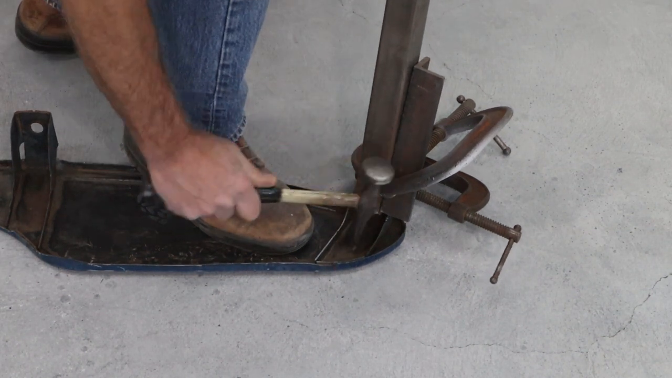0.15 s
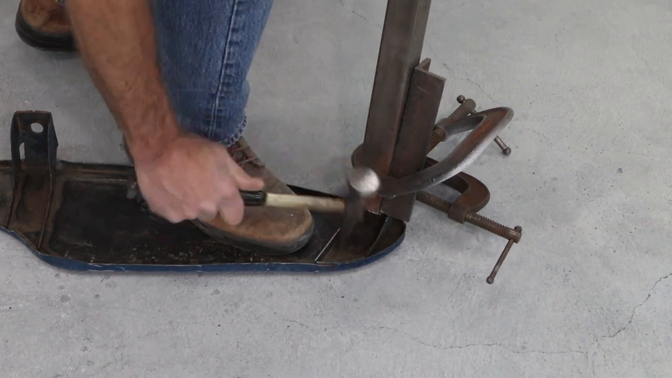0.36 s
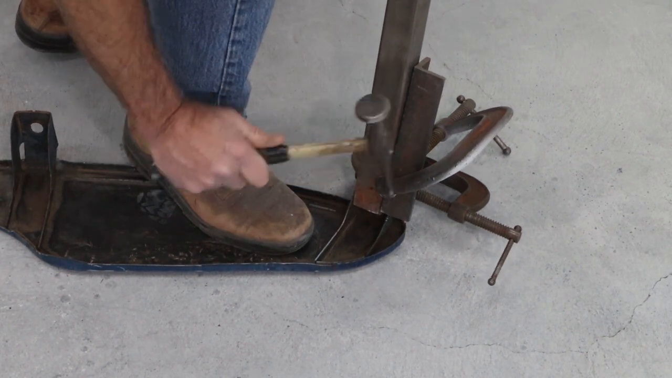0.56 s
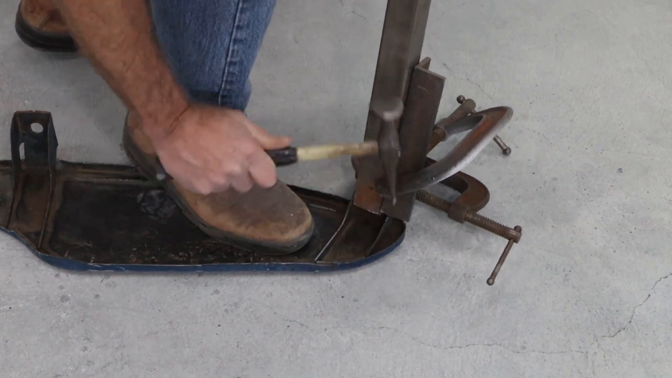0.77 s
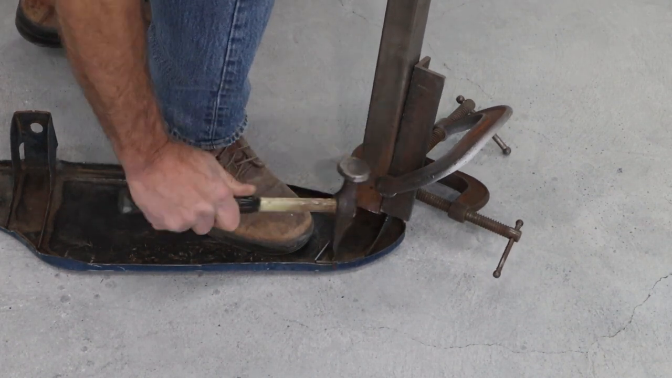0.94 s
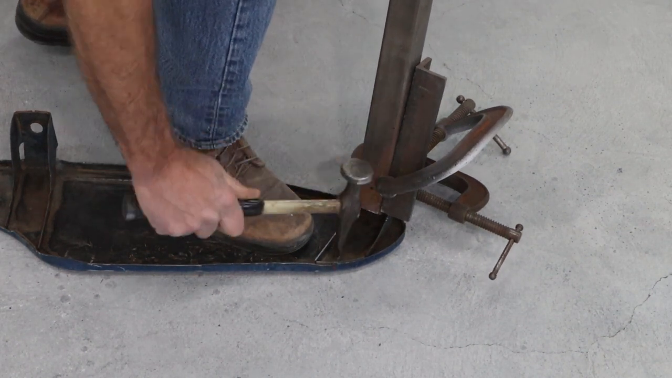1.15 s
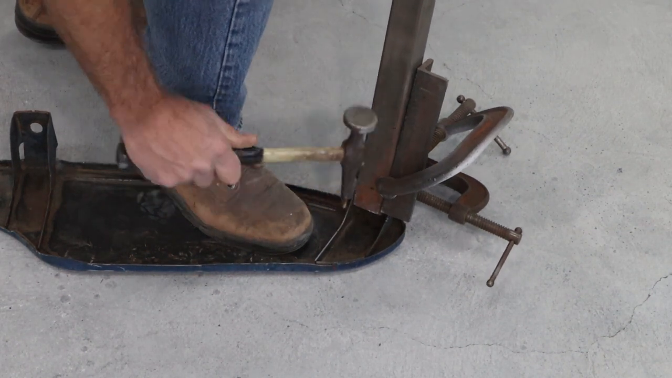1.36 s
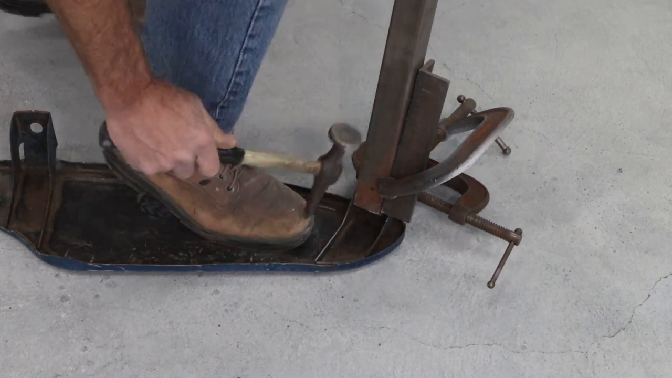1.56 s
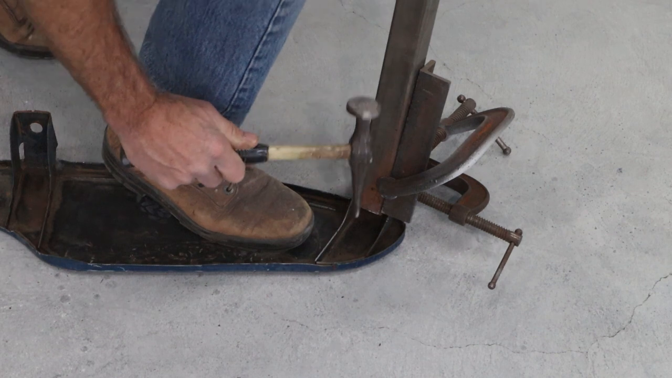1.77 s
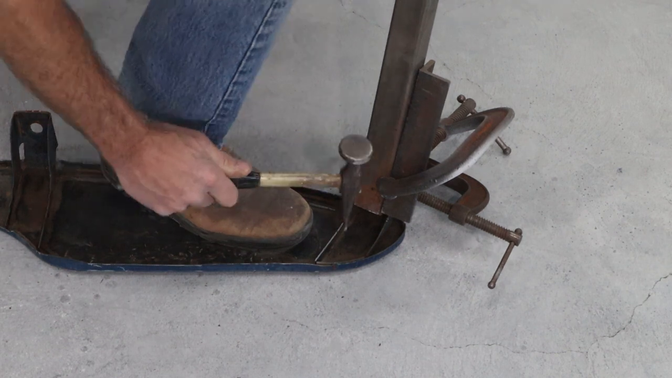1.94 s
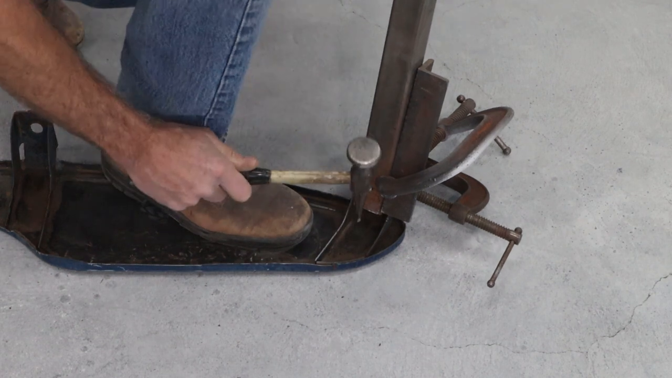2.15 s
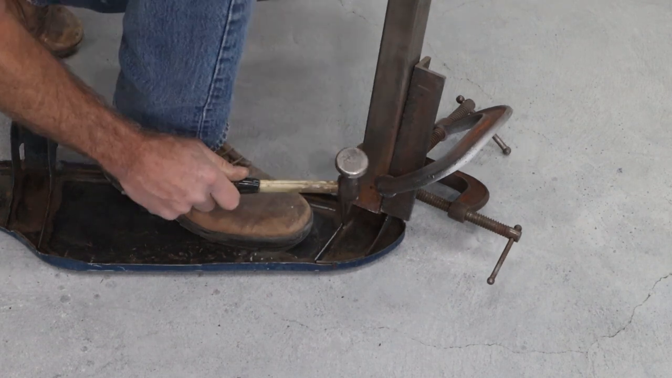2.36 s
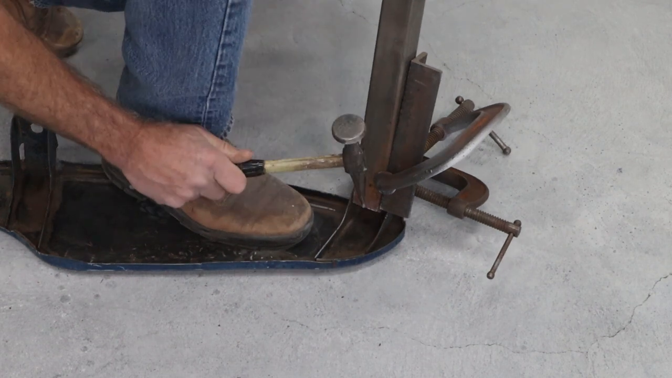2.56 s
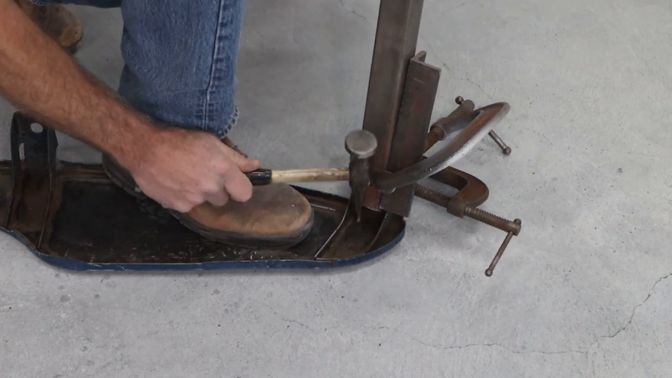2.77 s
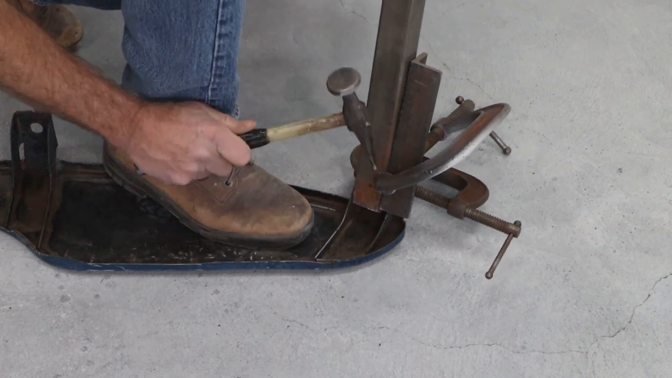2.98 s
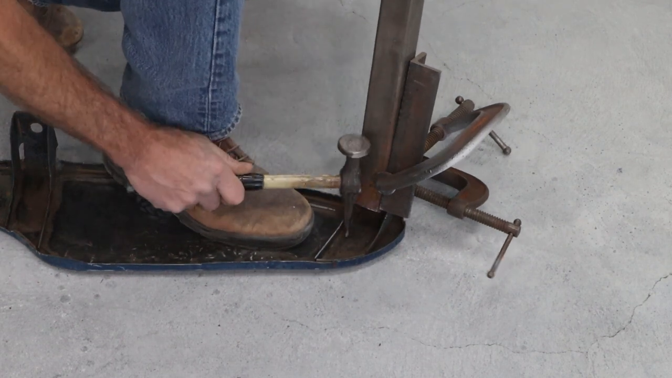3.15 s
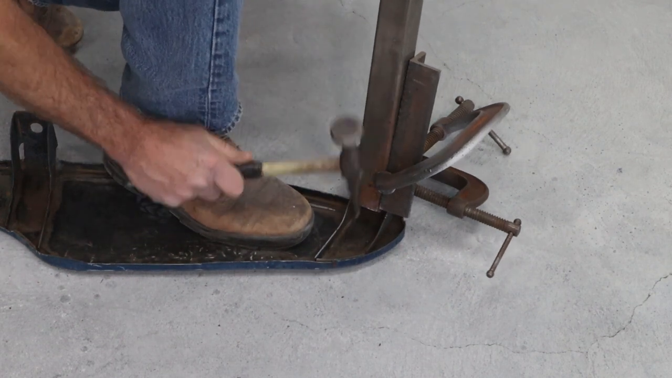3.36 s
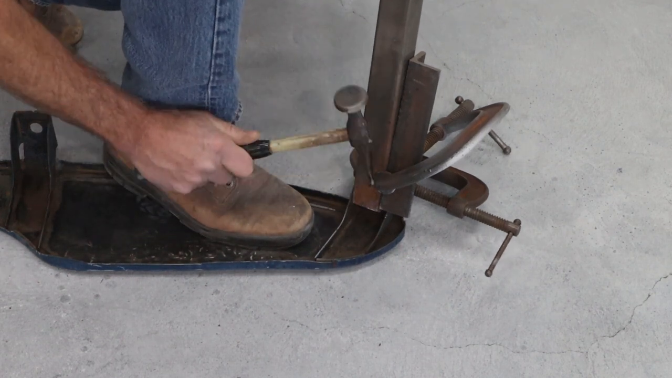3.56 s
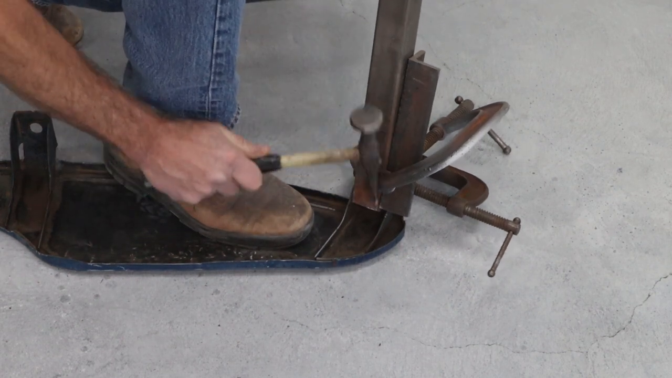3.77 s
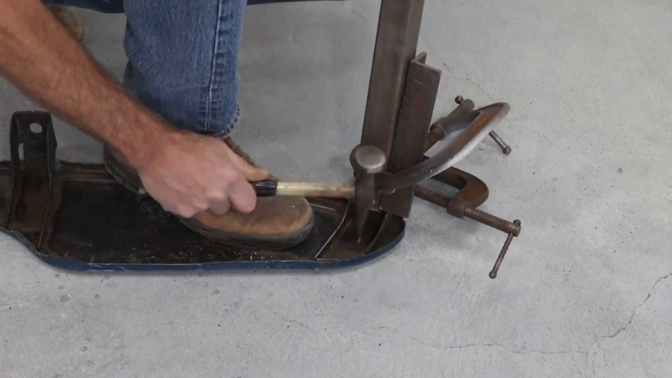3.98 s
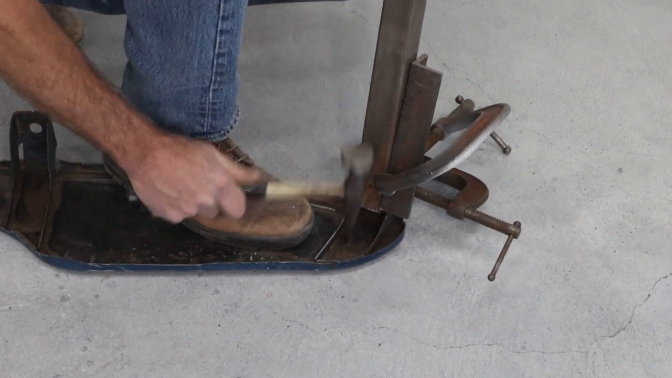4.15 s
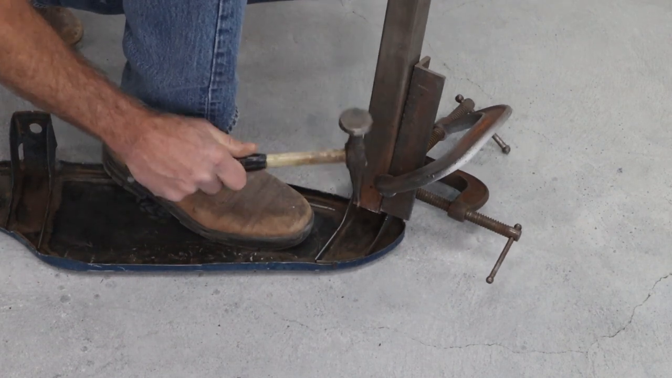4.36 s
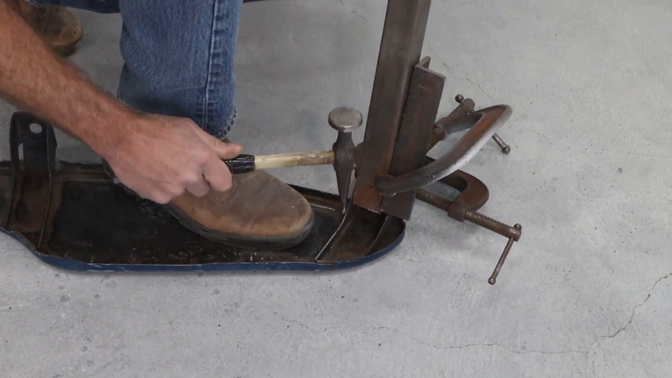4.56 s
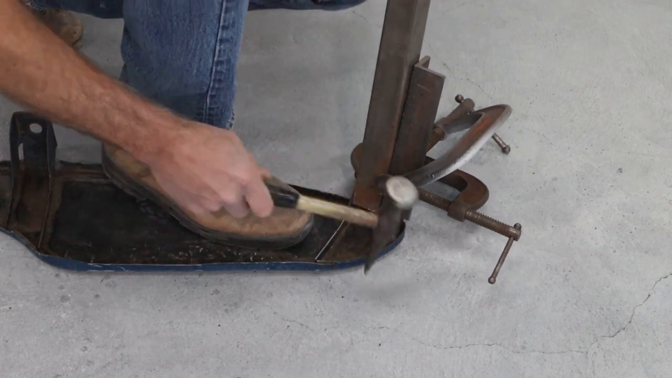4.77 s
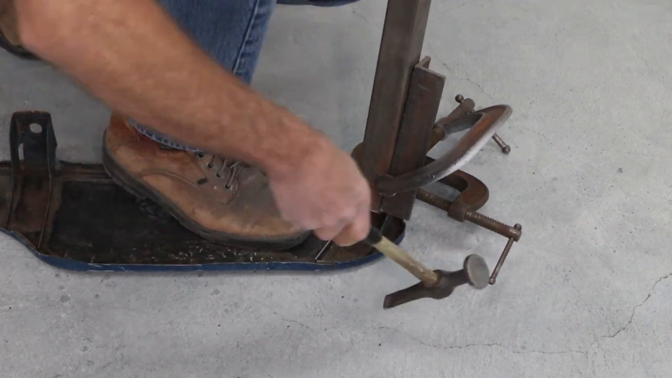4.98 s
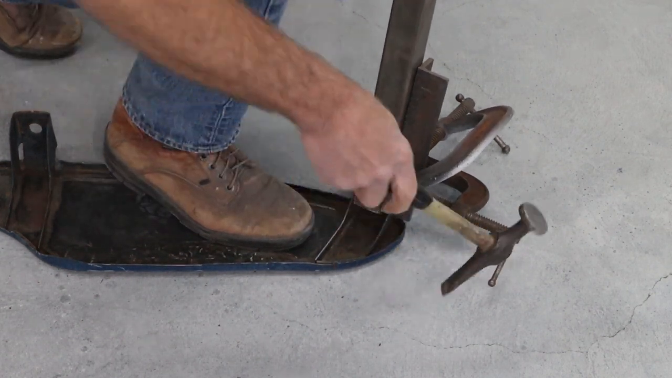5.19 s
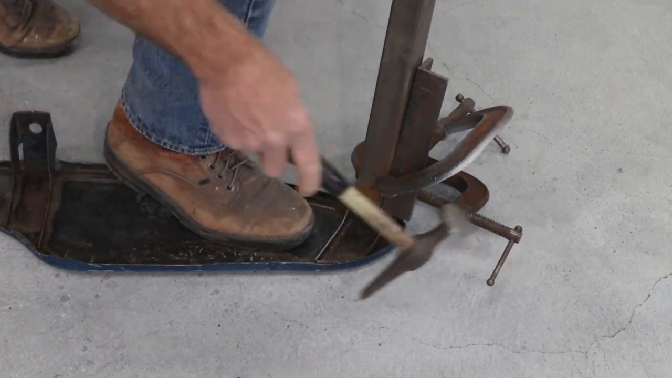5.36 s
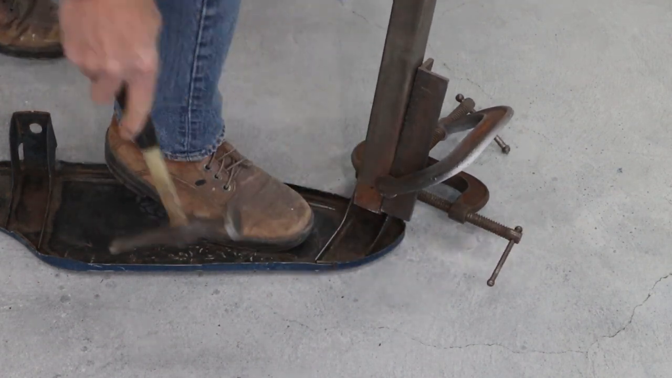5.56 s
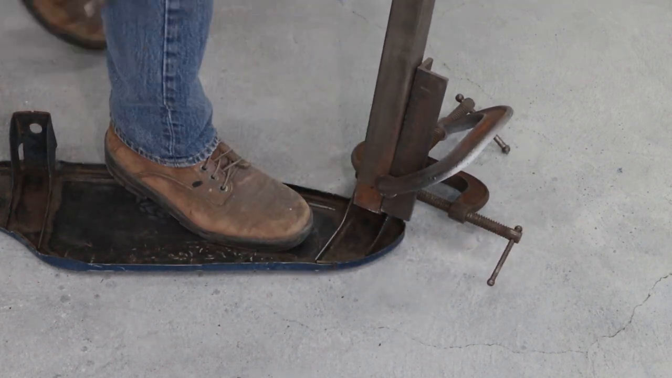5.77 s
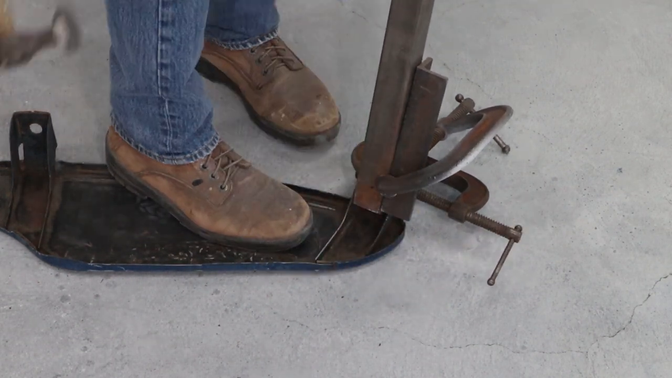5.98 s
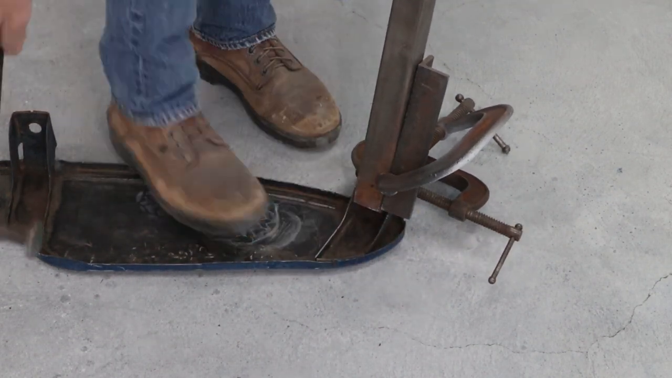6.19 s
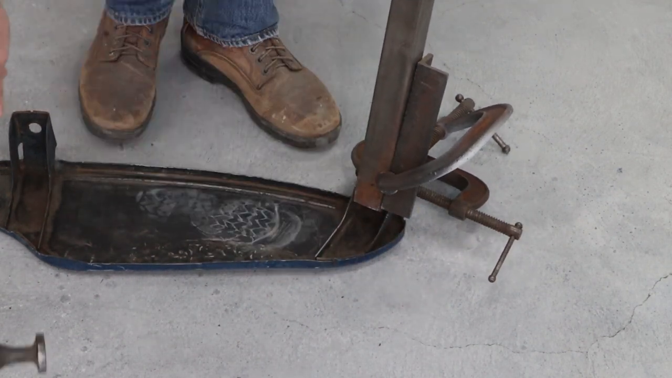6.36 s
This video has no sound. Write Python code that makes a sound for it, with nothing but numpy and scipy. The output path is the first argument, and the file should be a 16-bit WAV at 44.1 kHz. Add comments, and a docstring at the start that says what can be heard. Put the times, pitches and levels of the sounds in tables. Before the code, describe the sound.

In a hard, echoing workshop, a hammer strikes the rim of a steel pan held under a boot. The tail of an earlier blow fades, then five harsh cracks follow at quarter-second spacing. A pause brings dull boot knocks, shuffles and faint taps; six more blows come more slowly. Finally the boot thuds and scrapes gritty off the metal. One close microphone, slightly overloaded by the blows, with soft hiss beneath.

```python
"""The dying ring of a blow already struck, then run after run of cracks: a hand hammer works along the rim
of a steel pan that a boot pins to a concrete workshop floor. Each blow excites damped modes, a noise burst
and a floor thump; a diffuse echo fills the hard room and a limiter ducks after loud blows.
Between the runs the boot knocks (low ring and snap) and shuffles (lumpy noise); at last it scrapes off
the pan (dense grains). Steady hiss and a faint whine lie beneath."""
import sys
import numpy as np
from scipy import signal
from scipy.fft import rfft, irfft
from scipy.io import wavfile
from scipy.ndimage import minimum_filter1d

SR = 44100
rng = np.random.default_rng(int(sys.argv[2]) if len(sys.argv) > 2 else 0)


def to_wav(s):
    """Save 16-bit WAV."""
    ch = np.atleast_2d(s).T  # columns
    pcm = np.round(np.clip(ch, -1, 1) * 32767)  # PCM
    wavfile.write(sys.argv[1], SR, pcm.astype(np.int16))


def makeup_ratio(level_db):
    """Linear amplitude ratio for a level in decibels (20 dB per factor of ten)."""
    decades = np.asarray(level_db, float) / 20
    return 10 ** decades


N = 283424
LEAD = SR // 4   # samples of run-in, so that earlier sound is already ringing

# All spectra and mode levels are relative; columns are named quantity/unit.
# steady background hiss: (f/Hz, level/dB per Hz)
AIR_SPECTRUM = [(15, -28), (25, 7), (81, 3), (204, 1), (341, -3.5), (542, -1), (674, -7.5), (1610, -11),
                (4920, -14.5), (12400, -16.5), (15500, -24.5), (16800, -29)]
AIR_DB = -64.5   # rms, ahead of the low cut
WHINE_HZ, WHINE_DB = 11900, -87.5

# reverberation of the workshop: (f/Hz, t60/s)
ROOM_DECAY = [(100, 0.28), (300, 0.99), (800, 0.91), (2000, 0.78), (5000, 0.69), (8000, 0.36), (13000, 0.3)]
ROOM_DB, BUILD_S = -6.5, 0.0092   # echo level against the sound fed in; build-up time constant
FEET_TO_ROOM_DB = -5.5

# low shuffles as the boot shifts its weight: (t/s, hold/s, level/dB)
SHUFFLES = [(1.98, 0.046, -61.5), (2.06, 0.059, -62), (2.24, 0.27, -68.5), (4.92, 0.12, -61),
            (5.57, .2, -67), (5.8, 0.121, -66), (6.09, 0.27, -61), (6.29, 0.086, -64.5)]
# shuffle spectrum: (f/Hz, level/dB per Hz)
SHUFFLE_SPECTRUM = [(30, -6), (100, 6), (250, -2), (600, -10.5), (1500, -20.5), (3000, -46.5)]
SHUFFLE_RISE_S, SHUFFLE_FALL_DB_PER_S = 0.03, 82.5
# grit under the sole dragging over steel: (t/s, hold/s, level/dB)
SCRAPES = [(1.75, .28, -67), (2.29, .02, -61.5), (5.6, .4, -72.5), (6.035, .03, -52), (6.1, .13, -61),
           (6.25, .02, -54), (6.3, .13, -62)]
# scrape spectrum: (f/Hz, level/dB per Hz)
SCRAPE_SPECTRUM = [(710, -52), (1200, -7), (1600, -8), (2200, -5.5), (3150, 0), (4250, 1), (5060, 6.5),
                   (7330, -6), (14000, -20.5)]
SCRAPE_RISE_S, SCRAPE_FALL_DB_PER_S = 0.008, 150.5

# boot leather and sole knocking: (t/s, level/dB, low ring f/Hz, snap level/dB against the ring)
KNOCKS = [(1.71, -42.5, 127, 5), (1.833, -44.5, 102, -8), (2.073, -38, 127.7, -13.5),
          (2.105, -40.5, 159, -27), (2.438, -40.5, 108, -3), (2.545, -38, 151, -22), (2.635, -45, 135, -8),
          (2.647, -45, 151, -23), (3.059, -32.5, 111, -7.5), (4.739, -56, 212.6, -11),
          (4.767, -50, 283, -4), (4.93, -33.5, 143.2, -1.5), (5.484, -35.5, 106, -14.5),
          (5.577, -38.5, 264.5, -13), (5.684, -42.5, 163, -8), (5.931, -32.5, 350, -8.5),
          (6.17, -43.5, 153, -8), (6.31, -37, 70, -22), (6.327, -33.5, 158, 0), (6.387, -50, 171, -24)]
# snap spectrum: (f/Hz, level/dB per Hz)
SNAP_SPECTRUM = [(150, -25.5), (400, 2), (800, 0), (1500, -13), (2500, -29), (6000, -36)]

# hammer blows, bounces and light taps:
# (t/s, relative level/dB, wall share/dB, treble share/dB, wall resonance f/Hz)
BLOWS = [(-0.075, 6.5, 2.5, 2, 2410), (0.169, 5.5, 1.5, 1, 3188), (0.1935, -5, -1, -1, 2330),
         (0.317, -21, 15, -8, 2290), (0.45, 5, 2, 1.5, 2650), (0.719, 4, 1, 0, 2517),
         (0.844, -19, 14, -4, 2636), (0.963, 3.5, -0.5, 3.5, 2790), (1.213, 2.5, -1.5, 0.5, 2761),
         (2.327, -26.5, 6, 12.5, 3310), (2.392, -19, -2.5, -1.5, 2600), (2.431, -30, -8, -6.5, 3150),
         (2.569, -27, 0, 5.5, 2506), (2.769, -1, 2, 1, 2920), (3.168, -7, 3.5, 6.5, 2881),
         (3.178, 3, 2.5, -2.5, 2860), (3.476, 1, 4, 1, 3207), (3.741, -0.5, 3, 3, 2915),
         (4.001, -14, 1, 2.5, 3223), (4.004, 0, 1.5, 2.5, 3272), (4.017, -15.5, 0, 0, 2987),
         (4.252, -2.5, 1, 2.5, 2885)]
# struck stretch of rim, changing as the hammer works along it:
# (t/s, rim resonance f/Hz, floor thump level/dB, lowest-mode boom level/dB), levels relative to the blow
RIM = [(.17, 5200, -42, -1), (.5, 5050, -36, 1.5), (1.21, 5200, -34.5, -1.5), (2.77, 5500, -33.5, -8),
       (3.3, 5450, -30, -9.5), (3.74, 5150, -31.5, -7.5), (4.25, 5400, -31.5, -1.5)]
# modes of the clamped pan: (f/Hz, relative level/dB, t60/s)
PAN_MODES = [(176, -20.5, 0.253), (307, -30.5, .25), (370, -48, 0.099), (503, -24, 0.11),
             (732.4, -25.5, .08), (839, -20, 0.18), (1006, -14, 0.065), (1270, -23, 0.21),
             (1310, -19.5, 0.027), (1592, -11, 0.095), (1978, -9.5, .06), (2168, -8, 0.093),
             (2700, -37, 0.026), (2874, -12.5, 0.15), (3100, -20.5, .05), (3250, -30, 0.043),
             (3456, -24, 0.26), (3310, -10, 0.16), (3520, -37.5, .04), (4150, -9.5, 0.12),
             (4078, -21.5, 0.017), (4900, -25, 0.15), (4520, -20, 0.036), (4920, -12, 0.21),
             (5200, -4.5, 0.069), (5615, 1, .05), (5948, 0, 0.017), (6200, -27, 0.019), (6404, -12.5, .04),
             (6660, -2.5, .03), (6760, -19, 0.074), (8900, -39, 0.01)]
# spectrum of the crack: (f/Hz, level/dB per Hz)
CRACK_SPECTRUM = [(70, -62.5), (150, -37), (260, -29), (420, -10.5), (700, -6.5), (1200, -7), (1800, -5),
                  (2800, -5), (4000, -2), (5300, -3), (6400, -9), (8500, -10.5), (11000, -17), (14000, -28),
                  (16500, -36.5)]
# pan wall resonance in the close crack: (width f/Hz, height level/dB)
WALL_PEAK = (280, 13.17)
# rim resonance in the close crack: (width f/Hz, height level/dB)
RIM_PEAK = (860, 12.07)

BOOM_HZ, WALL_HZ, RIM_HZ, TREBLE_HZ = 220, 1800, 3700, 6400   # where parts of the pan take over
FLOOR_SHARE_DB, FLOOR_DB_PER_DB = 1.5, 0.08   # harder blows move more of the pan floor
RING_DB, SCATTER_DB = -18, 3   # offset of all modes; chance spread from mode to mode
CRACK_DB, CRACK_T60_S, CLANG_DB, CLANG_T60_S = 0.5, 0.023, -8, 0.068
EVENNESS = 0.3   # share of the chance ripple taken out of each crack's spectrum
TICK_DB, TICK_S = -2, 0.0022   # steel-on-steel tick: energy against the crack, delay after first touch
ROOM_PEAK_SHARE = 0.53   # resonances stand out less once averaged over all directions
THUMP_HZ, THUMP_T60_S = 85, 0.05
SHEET_LOW_HZ = 260   # thin sheet radiates no bass
BURST = 4096   # samples of each crack

LOW_CUT_HZ = 58
LIMIT_DB, LIMIT_SHARE = -6, 0.21   # threshold; share of the excess turned into ducking
ATTACK_S, HOLD_S, RELEASE_DB_PER_S = 0.012, 0.038, 706


def rms_one(x):
    """Power normalisation: scales to rms 1."""
    return x / np.sqrt(np.mean(x ** 2) + 1e-20)


def at_hz(points, hz):
    """Logarithmic frequency axis: interpolates a table along it."""
    table = np.array(points)
    return np.interp(np.log(hz + 1), np.log(table[:, 0]), table[:, 1])


def coloured(x, spectrum):
    """Linear filtering: multiplies by the spectrum; white noise of rms 1 stays rms 1."""
    gain = makeup_ratio(at_hz(spectrum, np.fft.rfftfreq(len(x), 1 / SR)))
    return irfft(rfft(x) * rms_one(gain), len(x))


def clicks(times, sizes):
    """Impulse excitation: single samples on the run-in time axis."""
    out = np.full(LEAD + N, 1e-18)
    out[(np.asarray(times) * SR).astype(int) + LEAD] = sizes
    return out


def ring(x, hz, t60):
    """Damped harmonic oscillator: a unit click starts a decaying sine of initial height 1."""
    r, w = makeup_ratio(-60 / (t60 * SR)), 2 * np.pi * hz / SR
    return signal.lfilter([0, np.sin(w)], [1, -2 * r * np.cos(w), r * r], x)


def peak(hz, centre_hz, width_hz, top_db):
    """Resonance: a response standing top_db above its surroundings."""
    detuning = (hz ** 2 - centre_hz ** 2) / (hz * width_hz + 1)
    return 1 + (makeup_ratio(top_db) - 1) / (1 + 1j * detuning)


def strokes(rows, rise_s, fall_db_per_s):
    """Incoherent addition: strokes swell, hold and die away exponentially, and their powers add."""
    t, power = (np.arange(LEAD + N) - LEAD) / SR, 0
    for s, held_s, level_db in rows:
        swell = np.clip((t - s) / rise_s, 0, 1)
        falling_s = np.maximum(t - s - rise_s - held_s, 0)
        power = power + (swell * makeup_ratio(level_db - fall_db_per_s * falling_s)) ** 2
    return np.sqrt(power)


def air():
    """Stationary noise: steady room and microphone hiss, with a faint electrical whine."""
    t = np.arange(N) / SR
    hiss = makeup_ratio(AIR_DB) * coloured(rng.standard_normal(N), AIR_SPECTRUM)
    return hiss + makeup_ratio(WHINE_DB) * np.sin(2 * np.pi * WHINE_HZ * t)


def shop(x):
    """Diffuse reverberation: third-octave noise bands build up fast and die each at its own rate."""
    t, echo = np.arange(SR) / SR, 0
    edges = 40 * 2 ** np.arange(0, 8.8, 1 / 3)
    white = rng.standard_normal((2, SR))   # neighbouring bands take different noise
    for k, (low, high) in enumerate(zip(edges, edges[1:])):
        band_pass = signal.butter(2, [low, high], "band", fs=SR, output="sos")
        band = signal.sosfilt(band_pass, white[k % 2])
        t60 = at_hz(ROOM_DECAY, np.sqrt(low * high))
        echo = echo + band * makeup_ratio(-60 * t / t60) / np.sqrt(t60)
    echo = echo * (1 - np.exp(-t / BUILD_S))
    return signal.fftconvolve(x, echo / np.sqrt(np.sum(echo ** 2)))[:len(x)]


def boot():
    """Friction noise: a lumpy low shuffle, and grit dragged over steel as dense small grains."""
    size = LEAD + N
    lumps = rms_one(signal.lfilter([1], [1, -1.99, .990025], rng.standard_normal(size)))
    shuffle = coloured(rng.standard_normal(size), SHUFFLE_SPECTRUM) * makeup_ratio(1.7 * lumps)
    grains = rng.standard_normal(size) * makeup_ratio(rng.exponential(1, size))
    grains = grains * (rng.random(size) < .15)
    scrape = coloured(rms_one(grains), SCRAPE_SPECTRUM)
    return (shuffle * strokes(SHUFFLES, SHUFFLE_RISE_S, SHUFFLE_FALL_DB_PER_S)
            + scrape * strokes(SCRAPES, SCRAPE_RISE_S, SCRAPE_FALL_DB_PER_S))


def knocks():
    """Heavy damping: dull clicks of a brief low ring and a short snap of noise."""
    out, t = np.zeros(LEAD + N), np.arange(2048) / SR
    for (s, level_db, hz, snap_db), noise in zip(KNOCKS, rng.standard_normal((len(KNOCKS), 2048))):
        body = np.sin(2 * np.pi * hz * t) * makeup_ratio(-60 * t / 0.021)
        snap_shape = makeup_ratio(-60 * t / .025) * (1 - np.exp(-t / .001))
        snap = makeup_ratio(snap_db) * coloured(noise, SNAP_SPECTRUM) * snap_shape
        at = int(s * SR) + LEAD
        out[at:at + 2048] += (makeup_ratio(level_db) * (body + snap))[:len(out) - at]
    return out


def pan_ring(s, blow_db, floor_db, boom_db, wall_db, treble_db):
    """Modal superposition: every contact strikes all modes of the pan anew."""
    out = np.zeros(LEAD + N)
    chance = rng.standard_normal((len(s), len(PAN_MODES)))
    late = rng.uniform(0.00041, .002, (len(s), len(PAN_MODES)))   # s; bending waves reach parts apart
    shares_db = [floor_db + boom_db, floor_db, wall_db, 0, treble_db]
    for k, (mode_hz, level_db, t60) in enumerate(PAN_MODES):
        share_db = shares_db[np.searchsorted([BOOM_HZ, WALL_HZ, RIM_HZ, TREBLE_HZ], mode_hz)]
        sizes = makeup_ratio(blow_db + share_db + RING_DB + level_db + SCATTER_DB * chance[:, k])
        out += ring(clicks(s + late[:, k], sizes), mode_hz, t60)
    return out


def cracks(s, blow_db, floor_db, wall_db, treble_db, wall_hz, rim_hz):
    """High modal density: countless close modes act as a noise burst; returns it close and all-round."""
    close, all_round = np.zeros((2, LEAD + N))
    hz, t = np.fft.rfftfreq(BURST, 1 / SR), np.arange(BURST) / SR
    # a sharp crack, then a clang that the boot damps quickly
    burst = makeup_ratio(-60 * t / CRACK_T60_S) + makeup_ratio(CLANG_DB - 60 * t / CLANG_T60_S)
    burst = burst * (1 - np.exp(-(t / .002) ** 3))
    size = np.sqrt(np.sum(burst ** 2))
    tick = makeup_ratio(TICK_DB) * size * np.exp(-2j * np.pi * hz * TICK_S)
    fade = np.minimum(t / .0015, 1) * np.clip(2 - 2 * t / t[-1], 0, 1) ** 2
    for i, noise in enumerate(rng.standard_normal((len(s), BURST))):
        waves = rfft(noise * burst)
        waves = waves * (size / np.abs(waves)) ** EVENNESS + tick
        shares = [(1300, floor_db[i]), (2600, wall_db[i]), (5000, 0), (8500, treble_db[i])]   # (f/Hz, level/dB)
        colour = makeup_ratio(at_hz(shares, hz) + blow_db[i] + CRACK_DB)
        ringing = peak(hz, wall_hz[i], *WALL_PEAK) * peak(hz, rim_hz[i], *RIM_PEAK) / makeup_ratio(RIM_PEAK[1])
        # summed over all directions the ripple of one listening spot is gone
        smooth = size * waves / np.abs(waves) * ringing ** ROOM_PEAK_SHARE
        at = int(s[i] * SR) + LEAD
        close[at:at + BURST] += coloured(irfft(waves * ringing * colour), CRACK_SPECTRUM) * fade
        all_round[at:at + BURST] += coloured(irfft(smooth * colour), CRACK_SPECTRUM) * fade
    return close, all_round


def hammer():
    """Impact excitation: each contact rings, cracks and thumps; returns close, all-round and thump."""
    s, blow_db, wall_db, treble_db, wall_hz = np.transpose(BLOWS)
    floor_db = FLOOR_SHARE_DB + FLOOR_DB_PER_DB * blow_db
    rim_s, *along = np.transpose(RIM)
    rim_hz, thump_db, boom_db = [np.interp(s, rim_s, column) for column in along]
    thump = ring(clicks(s, makeup_ratio(blow_db + thump_db)), THUMP_HZ, THUMP_T60_S)
    modes = pan_ring(s, blow_db, floor_db, boom_db, wall_db, treble_db)
    close, all_round = cracks(s, blow_db, floor_db, wall_db, treble_db, wall_hz, rim_hz)
    return modes + close, modes + all_round, thump


def scene():
    """Superposition: close sound plus room, heard by one microphone on both channels."""
    steel, radiated, thump = hammer()
    feet = knocks()
    thin = signal.butter(4, SHEET_LOW_HZ, "high", fs=SR, output="sos")
    steel, radiated = signal.sosfilt(thin, [steel, radiated])
    room = makeup_ratio(ROOM_DB) * shop(radiated + makeup_ratio(FEET_TO_ROOM_DB) * feet)
    mix = steel + thump + feet + boot() + room
    return np.tile(mix[LEAD:] + air(), (2, 1))


def band_limit(x):
    """A steep low-pass at the top of the band."""
    return signal.sosfilt(signal.butter(12, 16920, fs=SR, output="sos"), x)


def record(dry):
    """Dynamic limiting: gain lags the first swing, which may clip, holds down, then recovers steadily."""
    dry = signal.sosfilt(signal.butter(2, LOW_CUT_HZ, "high", fs=SR, output="sos"), dry)
    level_db = 20 * np.log10(np.abs(dry[0]) + 1e-9)
    over_db = np.maximum(level_db - LIMIT_DB, 0) * LIMIT_SHARE
    hold = int(HOLD_S * SR) | 1
    held_db = -minimum_filter1d(-over_db, size=hold, origin=hold // 2)   # greatest of the recent past
    slope = RELEASE_DB_PER_S * np.arange(N) / SR
    duck_db = np.maximum.accumulate(held_db + slope) - slope
    r = np.exp(-1 / (ATTACK_S * SR))
    duck_db = signal.lfilter([1 - r], [1, -r], duck_db)
    mix = np.clip(dry * makeup_ratio(-duck_db), -1, 1)
    return band_limit(mix)


dry = scene()
out = record(dry)
to_wav(out)
```